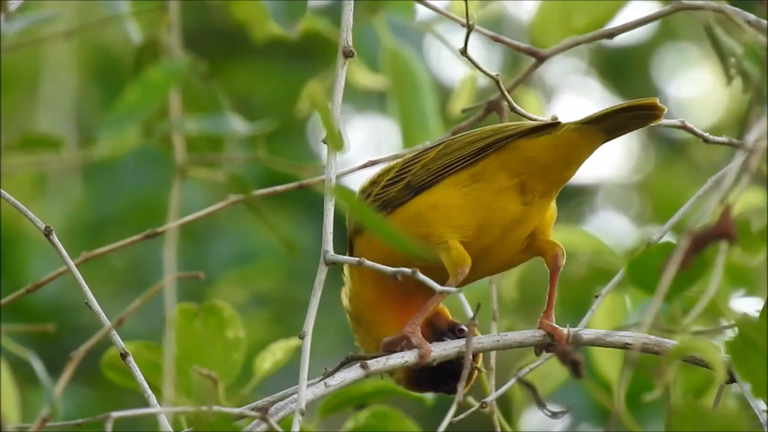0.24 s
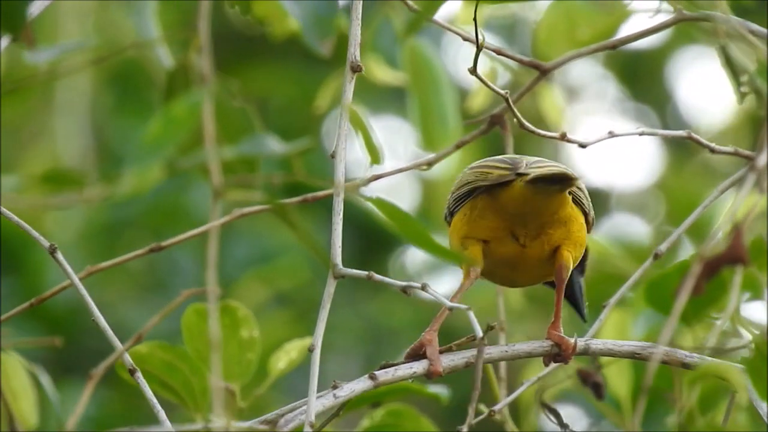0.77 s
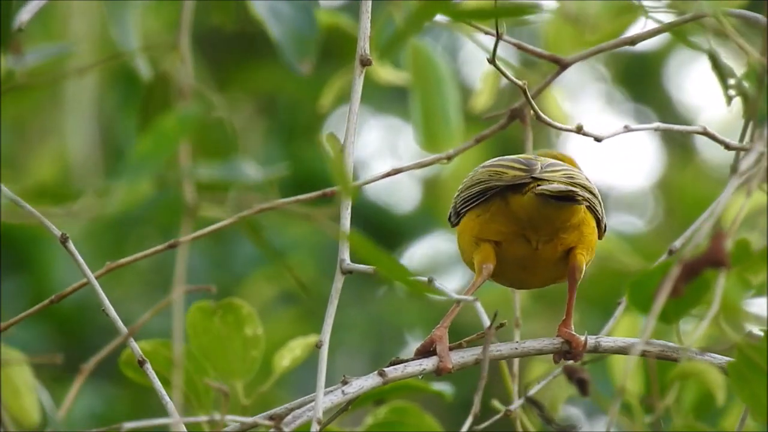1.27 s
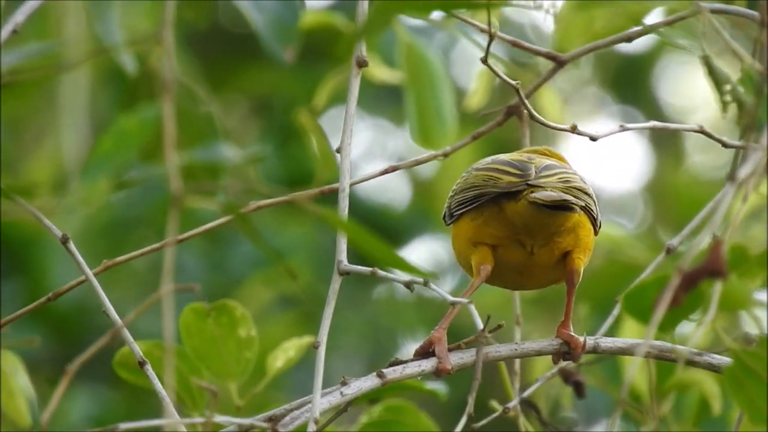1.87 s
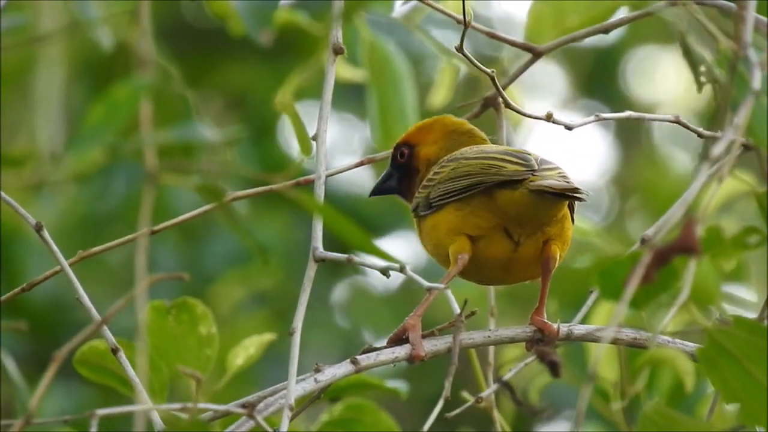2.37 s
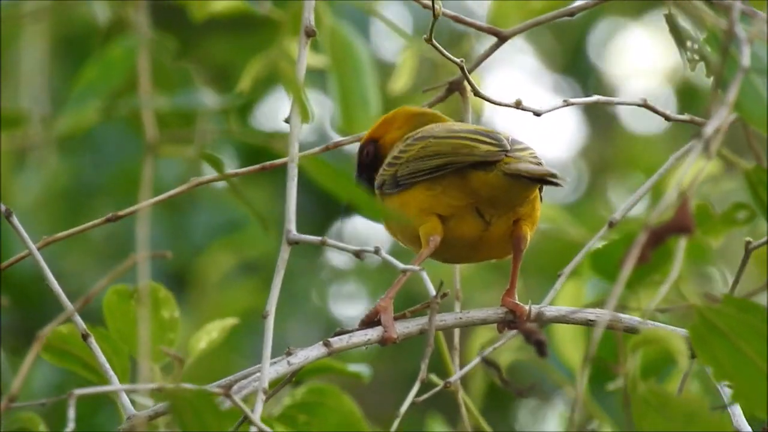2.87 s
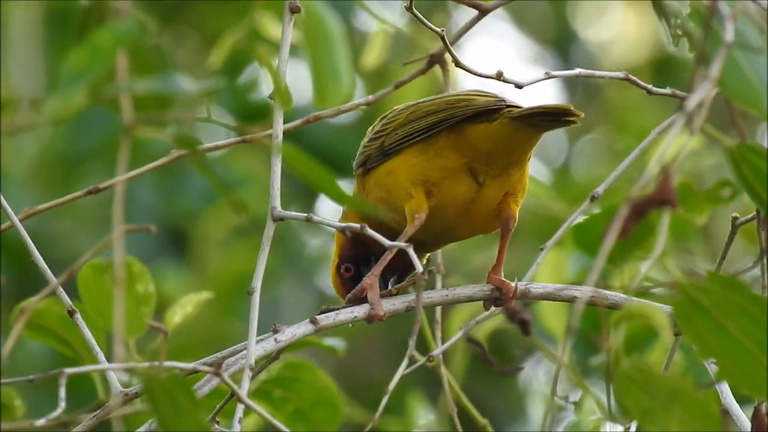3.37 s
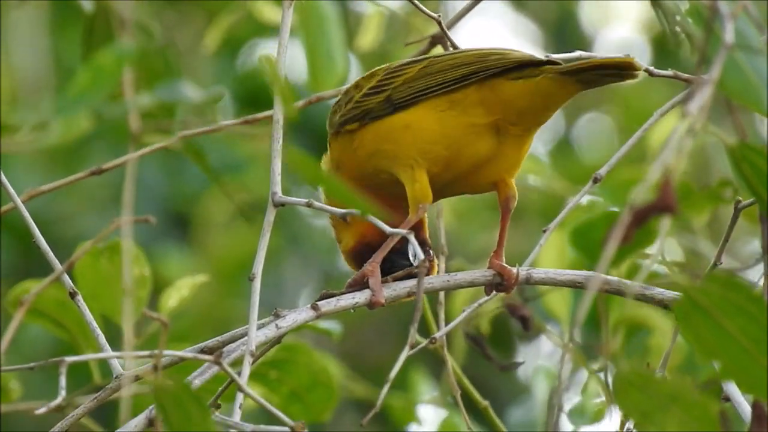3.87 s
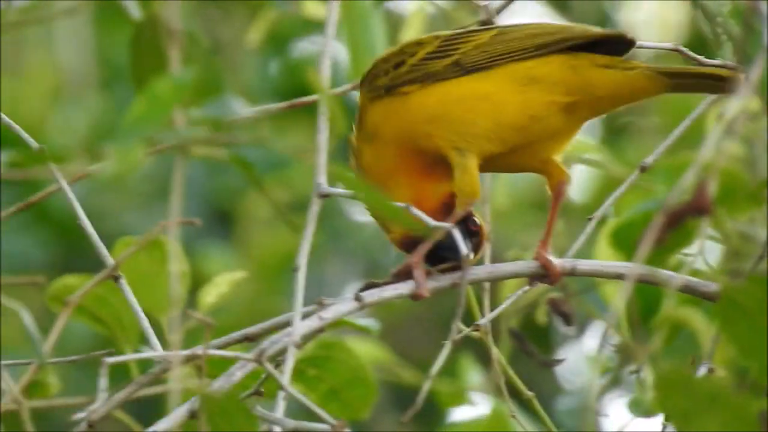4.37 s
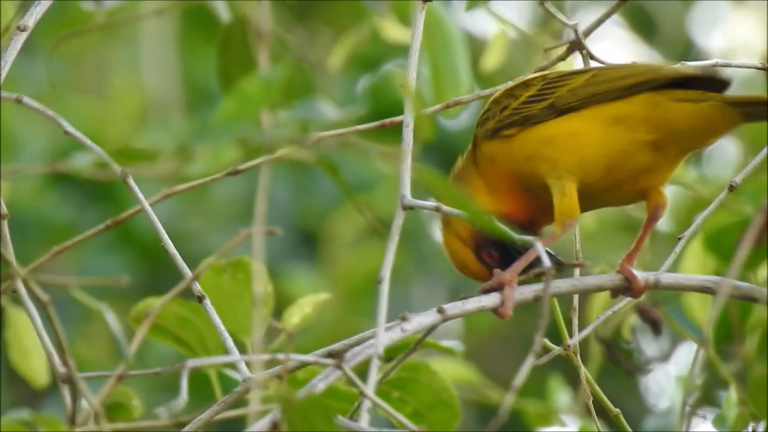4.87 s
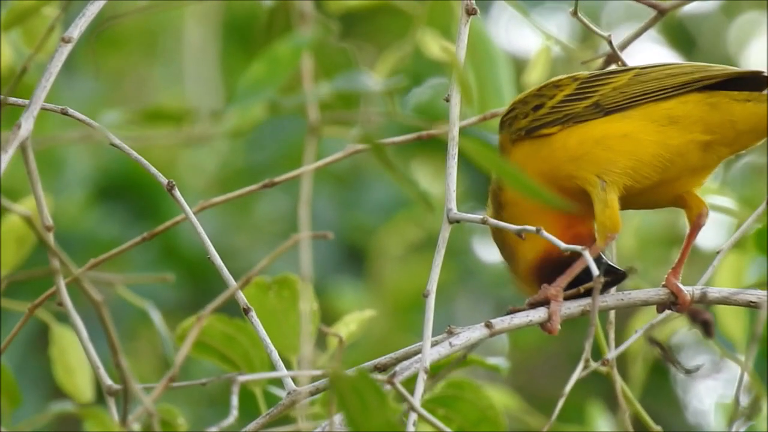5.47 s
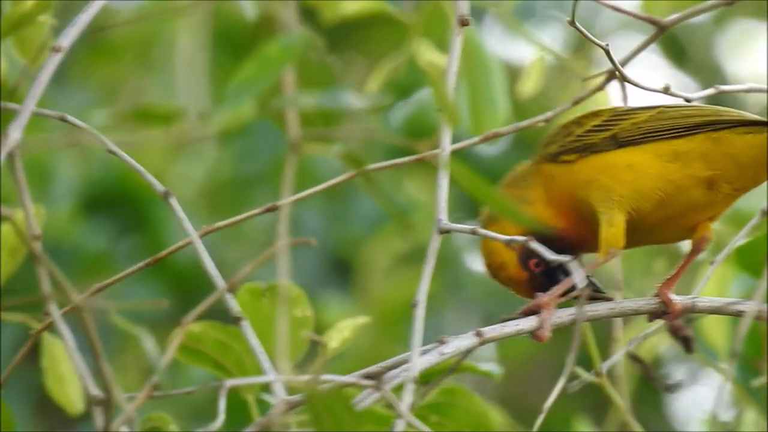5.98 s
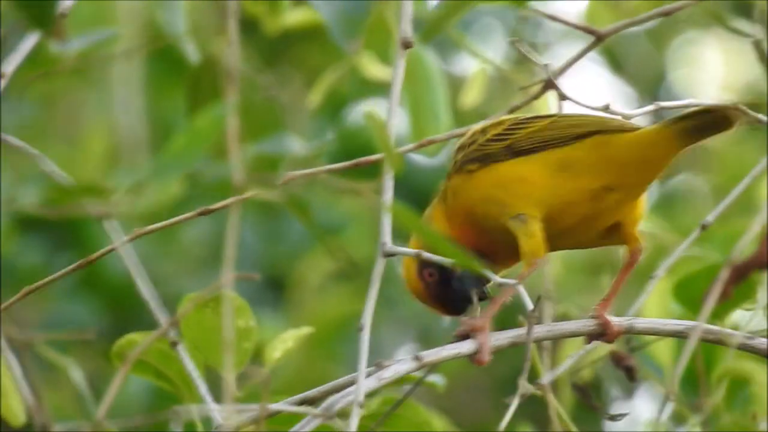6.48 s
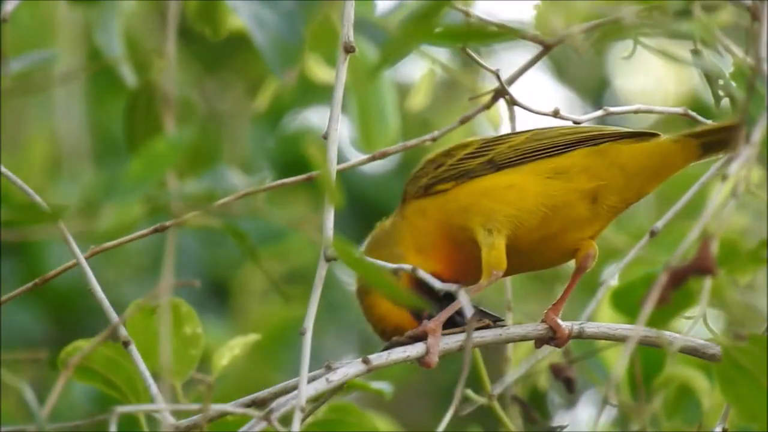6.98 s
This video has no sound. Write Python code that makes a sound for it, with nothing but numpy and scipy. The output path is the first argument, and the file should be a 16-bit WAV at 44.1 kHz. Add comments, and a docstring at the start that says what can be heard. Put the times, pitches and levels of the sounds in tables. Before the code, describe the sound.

Dense high bird chatter in leafy branches, a run of dry chips, one instant of silence with soft bumps, then wings fluttering past.

```python
"""Short slurred whistles and calls open at once from a shrub full of weaver birds; a run of dry chips soon joins.
Calls are a wheeze, an arch and a tail: gliding tones, roughened by trill, shake and hiss. Chips are rattling bursts.
Sparse echoes stand for leaves and twigs; shaped noise makes a low outdoor rumble, a breeze and a far drone.
The sound cuts out for an instant and returns with a few soft bumps; later a bird flutters past close by,
made of ringing puffs at the wingbeat rate and a swish of noise."""
import sys
import numpy as np
from scipy import signal
from scipy.fft import rfft, irfft, next_fast_len
from scipy.io import wavfile
from scipy.ndimage import uniform_filter1d

SR = 44100
rng = np.random.default_rng(int(sys.argv[2]) if len(sys.argv) > 2 else 0)


def put_to_file(sound):
    """Save the sound as 16-bit audio at rate SR, in the file named by the first command-line argument."""
    columns = np.atleast_2d(sound).T  # one column per channel
    safe = np.clip(columns, -1, 1)
    whole_steps = np.round(safe * 32767)
    wavfile.write(sys.argv[1], SR, whole_steps.astype(np.int16))


N = 319284

# moments within a note at which its four pitches are reached [share of its length]
STAGES = [0, .25, .7, 1]
# places in the shrub where birds sit, by name: (left minus right level/dB, lead of the left microphone t/ms)
SEATS = {"left": (1.8, 0.054), "front": (-0.91, 0.044), "low": (-2.5, 0.051), "back": (-1.6, -.04),
         "right": (-3.5, -0.041), "near right": (-2, .05)}
LEG_S = .011  # faint run-in and run-out of a note


def gain_of(db):
    """Decibels to amplitude."""
    return 10 ** (np.asarray(db) / 20)


def evened(x):
    """Scales to an rms of 1."""
    return x / np.sqrt(np.mean(x ** 2) + 1e-20)


def read(points, hz):
    """Reads a table on a log-frequency axis."""
    f, value = np.transpose(points)
    return np.interp(np.log(hz + 1), np.log(f + 1), value)


def add(mix, s, sound):
    """Mixes a sound in at time s; what falls outside the scene is dropped."""
    at = round(s * SR)
    sound = sound[:, max(-at, 0):]
    part = mix[:, max(at, 0):][:, :sound.shape[1]]
    part += sound[:, :part.shape[1]]


def wobble(rate_hz, size):
    """Smooth random motion of rms about 1, with little left above the given rate."""
    hz = np.fft.rfftfreq(8192, 1 / SR)
    smooth = rfft(rng.standard_normal(8192)) / (1 + (hz / rate_hz) ** 4)
    return evened(irfft(smooth))[:size]


def resonate(x, hz, width):
    """A two-pole resonance."""
    return signal.lfilter(*signal.iirpeak(hz, hz / width, fs=SR), x)


def place(x, pan_db, lead_ms):
    """Sends a sound to the two microphones with a level and a time difference."""
    size = next_fast_len(len(x) + 64)
    side = np.array([[.5], [-.5]])
    turn = np.exp(2j * np.pi * np.fft.rfftfreq(size, 1 / SR) * side * lead_ms / 1000)
    return irfft(rfft(x, size) * turn, size) * evened(gain_of(side * pan_db))


def echoes(start_s, t60_scale):
    """Sparse scattered echoes for two microphones, each band dying at its own speed."""
    # unscaled decay by 60 dB among the leaves: (f/Hz, t/s)
    leaf_decay = [(300, 0.67), (3000, 0.66), (5500, 0.4), (9000, 0.22)]
    size = 16000
    taps = np.zeros((2, size))
    at = np.arange(0, size, 10) + rng.integers(0, 10, (2, size // 10))
    np.put_along_axis(taps, at, rng.choice([-1., 1.], at.shape), 1)
    hz, t, z = signal.stft(taps, SR, nperseg=256)
    t60 = t60_scale * read(leaf_decay, hz)[:, None]
    tail = signal.istft(z * gain_of(-60 * t / t60), SR, nperseg=256)[1]
    tail *= 1 - np.exp(-(np.arange(tail.shape[1]) / SR / start_s) ** 2)
    tail = tail + 0.24 * tail[::-1]  # the microphones stand close together
    return tail / np.linalg.norm(tail[0])


def shrub(x, start_s, t60_scale, count=3):
    """The birds shift about, so the pattern of echoes keeps changing: several echo sets slowly trade places."""
    turn = np.pi * np.arange(N) / SR
    out = np.zeros((2, N))
    for k in range(count):
        feed = x.mean(0) * np.cos(turn + np.pi * k / count) * np.sqrt(2 / count)
        out += signal.oaconvolve(feed[None], echoes(start_s, t60_scale), axes=1)[:, :N]
    return out


def air(patch_db=5.5, wash_db=-51):
    """Rumble and breeze in the leaves, noise with separate swells in each, over a far drone of resonant noise."""
    # average outdoor spectrum: (f/Hz, relative level/dB per Hz)
    backdrop = [(15, -22), (25, -15), (86, 0), (169, -3), (631, -17.5), (762, -18.5), (1020, -18.5),
                (2120, -25), (2920, -21), (3530, -29.5), (3930, -24.5), (4750, -16), (7910, -27.5),
                (8580, -33.5), (15500, -41)]
    # far low drone: (f/Hz, width f/Hz, level/dB)
    drone_bands = [(76.3, 24.4, -57), (192.6, 55, -76)]
    # likeness of the two microphones: (f/Hz, correlation 0-1)
    likeness = [(30, 0.82), (250, 0.87), (1000, 0.77), (3000, 0.57), (6000, 0.057), (14000, 0.042)]
    # swell of the rumble, used relative to its median: (t/s, level/dB)
    rumble_swell = [(0, -50.5), (1.899, -47), (2.5, -49.5), (3.3, -57.5), (4.55, -58), (5.2, -48.5),
                    (5.7, -55.5), (7.24, -58)]
    # swell of the breeze, used relative to its median: (t/s, level/dB)
    breeze_swell = [(0, -67), (1.1, -66), (1.5, -63.5), (2.15, -68), (2.38, -61), (2.62, -61.5),
                    (2.95, -59.5), (3.55, -67), (4.2, -61), (4.95, -70.5), (6.05, -62.5), (6.6, -69),
                    (7.05, -63.5)]
    deep_rise_db_per_s = 3.5  # the deepest rumble slowly comes in; weighted by frequency below

    frames, hz = N // 512 + 5, np.fft.rfftfreq(2048, 1 / SR)
    a, b, c, d, patches = rng.standard_normal((5, frames, len(hz)))
    t = np.arange(frames) * 512 / SR

    def swell(points):
        """Level around the median, frame by frame, in dB."""
        s, level = np.transpose(points)
        return np.interp(t, s, level - np.median(level))[:, None]

    patches = evened(uniform_filter1d(uniform_filter1d(patches, 10, 0), 6, 1))
    # the rumble is steadier than the leaves
    field = read(backdrop, hz) + patch_db * patches * read([(250, 0.35), (450, 0.8)], hz)
    rumble_share = read([(40, 0.11), (80, .62), (200, 0.3), (380, 0.67), (550, 0)], hz)
    field += swell(rumble_swell) * rumble_share
    field += deep_rise_db_per_s * (t - t.mean())[:, None] * read([(36, 0.64), (70, 0.013)], hz)
    breeze_share = read([(250, 0.022), (550, 1.0), (1100, 0.51), (2500, 0.19)], hz)
    field += swell(breeze_swell) * breeze_share

    same, left = np.clip(read(likeness, hz), -1, 1), a + 1j * b
    right = same * left + np.sqrt(1 - same ** 2) * (c + 1j * d)
    z = np.array([left, right]) * gain_of(field)
    wash = evened(signal.istft(z.transpose(0, 2, 1), nperseg=2048, noverlap=1536)[1][:, :N])
    drone = np.zeros(N)
    for f, width, db in drone_bands:
        hum = resonate(resonate(rng.standard_normal(N), f, width), f, width)
        drone += gain_of(db) * evened(hum)
    return (gain_of(wash_db) * wash + drone) * gain_of([[-.55], [.55]])  # slightly louder on the right


def bumps(push_s=0.00053, rustle_db=-17, rustle_s=0.019, rustle_hz=600):
    """Each bump is a dull push, a quickly damped swing, followed by a short rustle of resonant noise."""
    # soft bumps at the microphone: (t/s, relative level/dB)
    knocks = [(2.2995, -34.5), (2.317, -33.5), (2.3328, -26.5), (2.3486, -25), (2.363, -33), (2.391, -35)]
    out, t = np.zeros((2, N)), np.arange(6000) / SR
    u = t / push_s
    push = -np.sin(u) * np.exp(-u / 3)
    for s, db in knocks:
        rustle = evened(resonate(resonate(rng.standard_normal(len(t)), rustle_hz, 420), rustle_hz, 530))
        rustle = gain_of(rustle_db) * rustle * np.exp(-t / rustle_s)
        add(out, s, gain_of(db) * (push + rustle)[None])
    return out


def wings(swish_db=-7, level_db=-44, uneven_db=3):
    """Each wingbeat pushes a low, ringing puff of air, with a swish of feathers; one swell as the bird passes."""
    beat_hz, body_hz, width_hz = 39.5, 198, 34
    at_s, rise_s, hold_s, fall_s, edge_db = 4.92, 0.094, 0.23, 0.25, -25
    s = at_s + np.cumsum([0, rise_s, hold_s, fall_s])
    beats = beat_hz * np.arange(N) / SR
    push = np.diff(np.floor(beats), prepend=0) * gain_of(uneven_db * rng.standard_normal(N))
    puff = resonate(resonate(push, body_hz, width_hz), body_hz, 220)
    feathers = rng.standard_normal(N) * np.exp(-(beats % 1) / 2.7)
    swish = resonate(resonate(feathers, 270, 230), 230, 240)
    pass_db = np.interp(np.arange(N) / SR, s, [edge_db, 0, 0, edge_db], left=-120, right=-120)
    return gain_of(level_db + pass_db) * evened(evened(puff) + gain_of(swish_db) * evened(swish))


def wheeze(size):
    """Air rushing through the syrinx: shaped noise of rms about 1."""
    # breathy hiss of a syrinx: (f/Hz, relative level/dB per Hz)
    breath = [(300, -56), (1500, -43), (2400, -24), (4000, 6.5), (6800, 2), (8200, -3), (10000, -10),
              (15500, -36)]
    hz = np.fft.rfftfreq(8192, 1 / SR)
    return evened(irfft(rfft(rng.standard_normal(8192)) * gain_of(read(breath, hz))))[:size]


def whistle(length, pitches, rough, rasp=0.054, waver=.013, shake=1.09, buzz_hz=330,
            overtone_db=-43, hiss_db=-17, leg_db=-10):
    """One note: a tone and its softer second voice glide through four pitches; a rough syrinx trills, shakes and hisses."""
    faded_db = -26
    second_ratio, second_db = .78, -23  # the other side of the syrinx sings softly at this share of the pitch
    # middling trill rate, then depths at full roughness: share of the pitch, share of the loudness
    trill_hz, trill_depth, trill_pulse = 350.2, 0.043, 0.64

    t = np.arange(-LEG_S, length + LEG_S, 1 / SR)
    size = len(t)
    # the glide carries on faintly at both ends, while the air pressure builds and drops
    first, shoulder, late, last = pitches
    slack = np.clip((last - 2800) / 2200, 0, 1)  # a note that ends low has little room left to fall
    run_in = first + np.clip(first - shoulder, -900, 300)
    run_out = last + slack * np.clip(last - late, -800, 200)
    hz = np.interp(t, [-LEG_S, *(length * np.array(STAGES)), length + LEG_S], [run_in, *pitches, run_out])
    hz = uniform_filter1d(hz, size // 12, mode="nearest")
    hz = hz * (1 + rasp * rough ** 2 * wobble(1030, size) + waver * wobble(235, size))
    trill = rough * np.sin(2 * np.pi * (trill_hz * rng.uniform(.75, 1.4) * t + rng.random()))
    hz = hz * (1 + trill_depth * trill)

    phase = 2 * np.pi * np.cumsum(hz) / SR
    second = gain_of(second_db) * np.sin(second_ratio * phase)
    tone = np.sin(phase) + second + gain_of(overtone_db) * np.sin(2 * phase)
    tone = tone * (1 + shake * (rough + 0.053) * wobble(buzz_hz, size))
    tone = tone * (1 + trill_pulse * trill)
    hiss = gain_of(hiss_db) * (rough + 0.66) * wheeze(size)

    rise = length * (.13 + .14 * rough)
    moments = [-LEG_S, 0, rise, .8 * length, length, length + LEG_S]
    db = np.interp(t, moments, [faded_db, leg_db, 0, 0, leg_db, faded_db])
    return evened((evened(tone) + hiss) * gain_of(db)) * np.sqrt(length * SR / size)


def glide(start_hz, end_hz):
    """The four pitches of a straight slide."""
    return start_hz + (end_hz - start_hz) * np.array(STAGES)


def colony(count=200, level_db=-60):
    """Distant birds sing arched whistles at random moments and pitches, heard only as echo."""
    out = np.zeros((2, N))
    for when, height, span, size in rng.random((count, 4)):
        arch = (3400 + 2400 * height) * np.array([.9, 1.08, 1, .85])
        add(out, when * N / SR, gain_of(6 * size) * whistle(.03 + .04 * span, arch, .2)[None])
    return gain_of(level_db) * evened(shrub(out, 0.012, 0.11, count=2))


def chip(length, hz, rough, rattle_hz=170, fall=0.2025, rasp=0.28, low_db=-20, hiss_db=-12,
         throat_db=-23.0, fade_db=-13):
    """A falling burst chopped into a rattle; its second harmonic is the loud one, and rough chips swell more slowly."""
    head_rasp, end_rasp = 0.29, 1.79  # a chip starts nearly pure and frays as it falls: shares of its rasp
    snap_db, snap_at_s, snap_s = -24, 0.0038, 0.0022  # noise crack near the start, stronger in crisp chips
    size = int(length * SR)
    u = np.linspace(0, 1, size)
    fray = head_rasp + (end_rasp - head_rasp) * u
    pitch = hz / 2 * (1 + fall * (.17 - u ** 2)) * (1 + rasp * fray * rough ** 2 * wobble(1160, size))
    phase = 2 * np.pi * np.cumsum(pitch) / SR
    beats = np.cumsum(rattle_hz * (1 + 0.45 * wobble(180, size))) / SR
    rattle = 1 - .65 * np.cos(2 * np.pi * beats)
    throat = evened(resonate(resonate(rng.standard_normal(8192), 2400, 700), 2400, 1000))[:size]
    noise = gain_of(hiss_db) * wheeze(size) + gain_of(throat_db) * throat
    tone = np.sin(2 * phase) + gain_of(low_db) * np.sin(phase) + rough * noise
    rise_s = .002 + .014 * rough ** 2
    swell = (1 - np.exp(-u * length / rise_s)) * gain_of(fade_db * u * (1.5 - rough / 2))
    crack = rng.standard_normal(size) * np.exp(-((u * length - snap_at_s) / snap_s) ** 2)
    snap = gain_of(snap_db) * (1.15 - rough) * crack
    return evened(tone * rattle * swell * signal.windows.tukey(size, .15)) + snap


def scolding(near_db=0.7, leaves_db=-3.5, far_db=-6.0, lead_in_db=-14):
    """The run of chips with its echoes; each opens with a faint squeak near its fundamental."""
    # one row a chip: (t/s, length t/s, nominal f/Hz, relative level/dB, perch)
    chip_run = [(0.563, 0.03, 5630, -34, "front"), (0.64, 0.0364, 5740, -30, "front"),
                (.728, 0.023, 6460, -32, "front"), (0.819, 0.034, 5740, -31, "front"),
                (0.914, 0.014, 5970, -30, "front"), (0.929, 0.045, 5490, -36.5, "back"),
                (1.007, 0.026, 6400, -37, "back"), (1.081, .055, 5600, -31.5, "front"),
                (1.174, 0.028, 6120, -29.5, "back"), (1.241, .034, 5460, -31.5, "front"),
                (1.274, 0.015, 6080, -30, "back"), (1.363, 0.035, 5865, -30, "back"),
                (1.523, 0.022, 5840, -31, "right"), (1.596, 0.03, 5750, -31, "back"),
                (1.717, 0.026, 5960, -30.5, "back"), (1.789, 0.022, 6050, -28.5, "right"),
                (1.86, 0.033, 5870, -31.5, "back"), (1.949, 0.031, 5940, -29, "back"),
                (2.049, 0.027, 6015, -27, "back"), (2.136, 0.029, 5830, -29.5, "back"),
                (2.219, 0.029, 5900, -28.5, "back")]
    # the chips grow crisper late in the run: (t/s, roughness 0-1)
    crispness = [(.6, 0.56), (1.55, 0.61), (1.8, 0.5)]
    direct, whole = np.zeros((2, 2, N))
    for s, length, hz, db, perch in chip_run:
        rough = np.clip(np.interp(s, *np.transpose(crispness)), 0, 1)
        pan_db, lead_ms = SEATS[perch]
        burst = gain_of(db) * chip(length, hz, rough)
        squeak = whistle(0.014, hz / 2 * glide(1.06, 0.93), .2)
        squeak = gain_of(db + lead_in_db) * (1 - rough) * squeak
        add(direct, s - LEG_S - .01, place(squeak, pan_db, lead_ms))
        add(direct, s, place(burst, pan_db, lead_ms))
        add(whole, s, burst[None])
    leaves = gain_of(leaves_db) * shrub(whole, 0.00076, 0.3)
    far = gain_of(far_db) * shrub(whole, 0.0099, 1.0)
    return gain_of(near_db) * direct + leaves + far


def notes():
    """Spells out calls and slurs as notes: (s, length, four pitches, dB, roughness, perch)."""
    # one row a call of wheeze, arched whistle and falling tail (None: that part is left out):
    # (t/s, arch length t/s, early f/Hz, late f/Hz, arch relative level/dB, roughness 0-1 (clipped),
    #  wheeze length t/s, wheeze relative level/dB, tail length t/s, tail f/Hz, tail relative level/dB, perch)
    calls = [(0.108, 0.042, 4950, 4720, -31, 0.7, 0.022, -39, .062, 4057, -43, "front"),
             (0.763, 0.037, 4950, 4630, -27, 0.64, .014, -26, 0.067, 4410, -41.5, "front"),
             (1.466, 0.033, 5260, 5260, -22, 0.16, .036, -28.5, .025, 4500, -30, "low"),
             (1.505, 0.027, 5330, 5240, -24, 0.07, None, None, 0.071, 4425, -37.5, "back"),
             (1.8, 0.042, 4760, 4460, -28, 0.14, 0.037, -33.5, 0.072, 3930, -42, "front"),
             (2.366, 0.025, 5130, 5350, -25, 0.16, 0.035, -46, None, None, None, "front"),
             (2.494, 0.061, 5506, 5470, -29, 0.43, 0.051, -38, 0.034, 4680, -39.5, "front"),
             (2.841, 0.053, 5250, 4510, -36.5, .32, 0.017, -42.5, None, None, None, "back"),
             (2.888, 0.039, 4170, 4290, -36.5, 0.05, None, None, None, None, None, "back"),
             (3.145, 0.033, 5000, 5500, -32, 0.14, .028, -48.5, 0.06, 5480, -49, "low"),
             (3.423, 0.039, 5030, 4080, -41, 0.23, 0.017, -47, None, None, None, "right"),
             (3.765, 0.069, 5380, 5250, -33, 0.62, 0.039, -40, 0.074, 4530, -43, "front"),
             (3.806, 0.051, 5250, 5520, -30.5, 0.4, None, None, None, None, None, "near right"),
             (3.894, 0.046, 5675, 5220, -26.5, 0.42, .045, -37.5, 0.058, 4690, -42.5, "front"),
             (4.361, 0.043, 5550, 4980, -35.5, 0.28, None, None, 0.024, 4070, -42, "back"),
             (4.427, .03, 4220, 4670, -37, 0.12, None, None, .018, 3490, -45, "back"),
             (4.629, .05, 5550, 5386, -27.5, 0.28, .055, -40.5, None, None, None, "front"),
             (4.681, .05, 5090, 5270, -30.5, 0.68, None, None, 0.1, 4380, -40, "front"),
             (5.29, 0.027, 5325, 5440, -23.5, 0, 0.049, -47, None, None, None, "near right"),
             (5.491, .053, 5630, 5350, -28, 0.45, .04, -41.5, 0.071, 4480, -40, "front"),
             (5.599, .075, 5190, 5310, -33, 0.63, 0.017, -40.5, 0.069, 4020, -51.5, "front"),
             (5.998, 0.028, 5210, 5320, -25, 0.05, 0.046, -51, None, None, None, "front"),
             (6.041, .036, 5120, 5000, -37, 0.55, None, None, 0.071, 4470, -37, "front"),
             (6.352, 0.047, 5500, 5433, -25.5, 0.3, 0.049, -39.5, None, None, None, "front"),
             (6.415, 0.026, 4700, 4586, -33, 0.1, None, None, 0.053, 4175, -40.5, "front"),
             (6.507, 0.045, 5840, 4800, -36.5, 0.6, None, None, None, None, None, "back"),
             (6.564, 0.032, 5080, 5360, -24, 0.19, None, None, None, None, None, "low"),
             (6.648, 0.059, 5180, 4870, -32, 0.36, 0.029, -39.5, 0.062, 4480, -43.5, "front"),
             (6.897, 0.047, 5650, 5480, -27.5, 0.59, 0.052, -40.5, 0.072, 4240, -45, "left"),
             (7.069, 0.039, 5640, 5240, -37, 1.1, 0.032, -45, 0.09, 4724, -35.5, "front")]
    # one row a lone slur, falling or rising:
    # (t/s, length t/s, start f/Hz, end f/Hz, relative level/dB, roughness 0-1 (clipped), perch)
    lone_slurs = [(0, .018, 6320, 6520, -25, 0.42, "left"), (.03, .09, 6500, 6360, -64, 0.53, "front"),
                  (0.152, 0.077, 6940, 6040, -42.5, 1.08, "low"),
                  (0.303, 0.058, 5950, 4320, -35, .75, "back"), (.349, .024, 3550, 4050, -33, 0.1, "low"),
                  (0.368, .033, 4290, 3066, -37, .6, "front"), (.401, .015, 7000, 5410, -26.5, 0.85, "low"),
                  (0.406, 0.077, 2670, 2044, -54.5, 0.48, "right"),
                  (0.439, 0.058, 5064, 3300, -35, 0.54, "right"),
                  (0.461, .028, 6720, 5440, -31.5, 0.83, "back"),
                  (0.956, 0.056, 4670, 3426, -39.5, 0.8, "right"),
                  (1.106, 0.048, 5100, 3060, -40.5, 0.65, "low"),
                  (1.31, 0.076, 5040, 4620, -42, 0.66, "right"),
                  (1.804, 0.048, 5660, 4360, -30.5, 0.48, "front"),
                  (2.288, 0.06, 3935, 3110, -39, 0.95, "front"),
                  (2.312, 0.053, 6700, 6160, -51.5, 0.94, "back"),
                  (2.6, 0.037, 3910, 4430, -40, .1, "left"), (2.878, .077, 1927, 1930, -60.5, .02, "low"),
                  (2.999, 0.018, 4480, 3840, -45.5, 0.4, "right"),
                  (3.03, 0.037, 3345, 3260, -48, .37, "front"),
                  (3.224, 0.052, 3650, 4150, -51.5, 0.55, "front"),
                  (3.478, 0.039, 3750, 3510, -38.5, 0.2, "right"),
                  (3.56, 0.053, 5900, 4650, -40, 0.72, "left"),
                  (3.603, 0.046, 4750, 3670, -33, 0.58, "front"),
                  (3.615, 0.059, 4950, 3810, -39, 0.9, "low"),
                  (3.664, 0.06, 3704, 3340, -40.5, 0.65, "front"),
                  (3.743, 0.057, 7830, 7000, -43, .95, "left"),
                  (3.988, 0.045, 3930, 4410, -41.5, 0.3, "low"),
                  (4.035, 0.11, 5960, 6340, -49, .47, "back"), (4.155, 0.052, 4490, 5230, -49, 0.1, "back"),
                  (4.739, 0.07, 5180, 4200, -43.5, 0.97, "front"),
                  (4.8, 0.036, 5920, 6330, -43.5, 0.77, "back"),
                  (4.856, 0.061, 3580, 3340, -50, 1.1, "front"),
                  (5.037, 0.024, 2440, 2300, -57, 0.1, "right"),
                  (5.357, 0.066, 3410, 4740, -47.5, 0.3, "low"),
                  (5.615, 0.062, 4650, 3690, -41.5, 0.79, "front"),
                  (5.639, 0.05, 3700, 3430, -47.5, 0.44, "right"),
                  (5.676, 0.1, 5950, 6180, -43.5, 0.2, "low"),
                  (5.686, .056, 6370, 7860, -46.5, 0.3, "front"),
                  (6.134, 0.032, 3880, 3150, -45, 0.72, "left"),
                  (6.15, 0.045, 2850, 2680, -53.5, 0.1, "left"),
                  (6.602, 0.03, 2960, 2710, -58, .49, "back"),
                  (6.662, 0.038, 5550, 5800, -31, 0.06, "left"),
                  (6.753, 0.058, 5820, 6370, -48.5, 0.93, "back"),
                  (6.953, 0.041, 5400, 5270, -45, 0.74, "back"), (7.011, 0.051, 5350, 5080, -46, .9, "low"),
                  (7.137, 0.06, 6300, 6700, -48.5, 1, "front"),
                  (7.196, 0.066, 3100, 2420, -49, 0.7, "left")]
    wheeze_rough, wheeze_hz = 0.9, [6030, 6310, 6650, 6120]  # the rasp that opens a call
    # a longer arch starts further below its top; all drop alike at the end
    arch_rise_hz_per_s, arch_flat_s, arch_drop_hz = 26000, .022, 818
    tail_fall_hz_per_s, tail_overlap_s = 11000, .006  # the tail begins just before the arch ends
    tail_rough, tail_rough_share = 0.54, 0.71  # a tail is rough, and more so after a rough arch

    for (s, length, early_hz, late_hz, db, rough,
         wheeze_s, wheeze_db, tail_s, tail_hz, tail_db, perch) in calls:
        start_hz = early_hz - arch_rise_hz_per_s * (length - arch_flat_s)
        yield s, length, [start_hz, early_hz, late_hz, late_hz - arch_drop_hz], db, rough, perch
        if wheeze_db is not None:
            yield s - wheeze_s, wheeze_s, wheeze_hz, wheeze_db, wheeze_rough, perch
        if tail_db is not None:
            fall = glide(tail_hz, tail_hz - tail_fall_hz_per_s * tail_s)
            roughness = tail_rough + tail_rough_share * rough
            yield s + length - tail_overlap_s, tail_s, fall, tail_db, roughness, perch
    for s, length, start_hz, end_hz, db, rough, perch in lone_slurs:
        yield s, length, glide(start_hz, end_hz), db, rough, perch


def song(near_db=0.36, leaves_db=-4.0, far_db=-7.5):
    """All calls and slurs; the rough ones come from deeper in the foliage and are more scattered."""
    direct, scattered, whole = np.zeros((3, 2, N))
    for s, length, pitches, db, rough, perch in notes():
        rough = np.clip(rough, 0, 1)
        note = gain_of(db) * whistle(length, pitches, rough)
        s = s - LEG_S  # the faint opening leg comes just before the note
        add(direct, s, place(note, *SEATS[perch]) * (1 - 0.11 * rough))
        add(scattered, s, note[None] * (rough + 0.39))
        add(whole, s, note[None] * (rough + 0.49))
    leaves = gain_of(leaves_db) * shrub(scattered, 0.015, 0.022)
    far = gain_of(far_db) * shrub(whole, 0.013, 0.99)
    return gain_of(near_db) * direct + leaves + far


def scene():
    """Birds near and far over the outdoor background."""
    return air() + bumps() + wings() + colony() + scolding() + song()


def record(dry):
    """The microphone thins the deepest bass; a brief dropout to silence, then the band limit."""
    # the silent instant: (start t/s, end t/s)
    silence = (2.2335, 2.2990)
    edge_hz = 15800
    t = np.arange(N) / SR
    thinned = signal.sosfilt(signal.butter(2, 33, "high", fs=SR, output="sos"), dry)
    live = uniform_filter1d(1. * ((t < silence[0]) | (t > silence[1])), size=24)
    lowpass = signal.firwin(511, edge_hz, window=("kaiser", 9), fs=SR)
    return signal.oaconvolve(thinned * live, lowpass[None], "same")


dry = scene()
out = record(dry)
put_to_file(out)
```